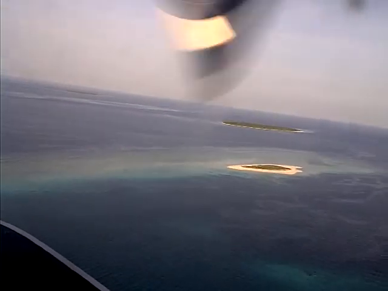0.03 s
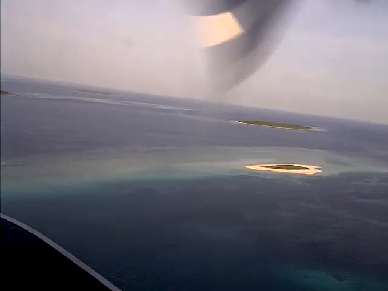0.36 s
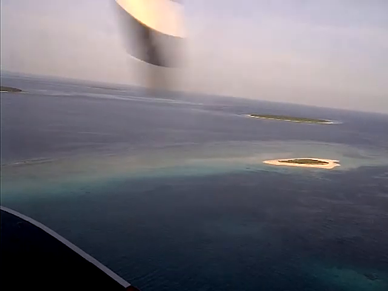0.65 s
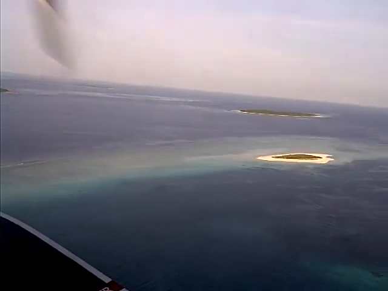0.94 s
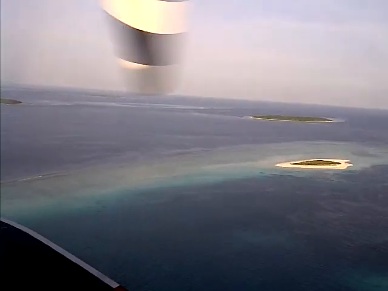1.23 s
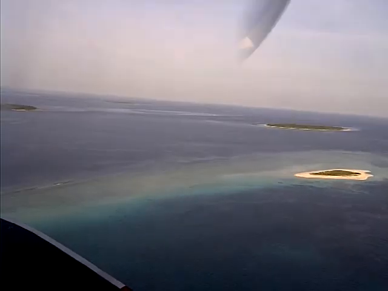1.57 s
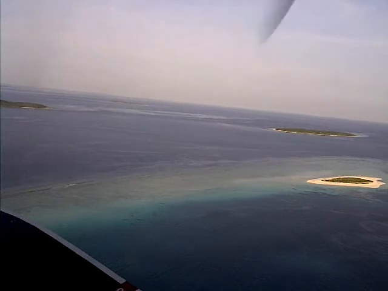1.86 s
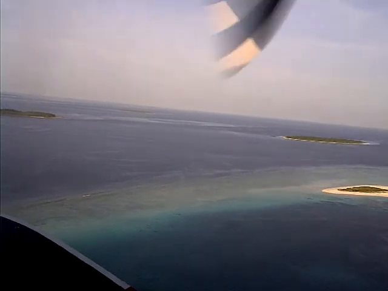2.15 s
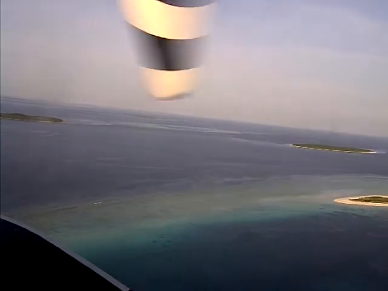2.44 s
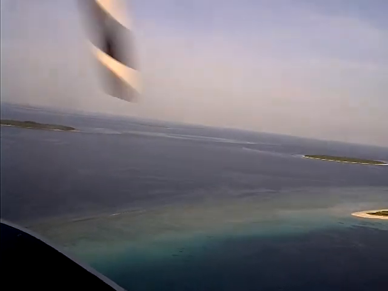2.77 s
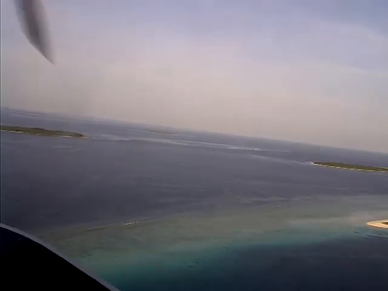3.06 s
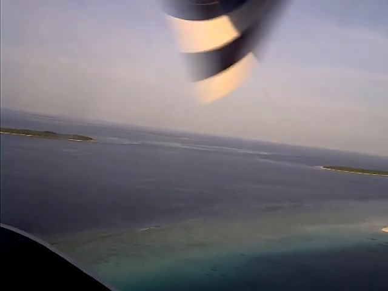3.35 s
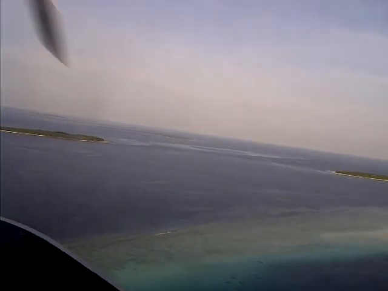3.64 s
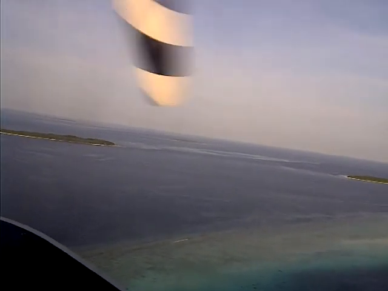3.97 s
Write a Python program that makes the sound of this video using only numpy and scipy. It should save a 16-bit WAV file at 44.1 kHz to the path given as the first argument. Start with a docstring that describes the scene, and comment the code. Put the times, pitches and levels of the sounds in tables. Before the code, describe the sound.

Two propellers drone loudly and throb, heard from the cockpit of a small plane in flight, with air rushing along the hull. A buzz rises, fades and returns while the pitch sinks slightly.

```python
"""Inside a small plane in flight, two three-bladed propellers drone while air roars along the hull.
From the start the engines slowly ease off. The propellers run slightly out of step, so each harmonic
(a multiple of the drone's pitch) throbs at its own pace. After one second a buzz stands out. Just past
two seconds the deepest note partly cancels, and an automatic volume control lifts the rushing air.
Around three seconds the buzz comes back, and the drone ends a little lower than it began."""
import sys
import numpy as np
from scipy import signal
from scipy.fft import rfft, irfft
from scipy.io import wavfile
from scipy.ndimage import uniform_filter1d

SR = 44100
rng = np.random.default_rng(int(sys.argv[2]) if len(sys.argv) > 2 else 0)


def bounce(signal):
    """Save signal as a 16-bit WAV file at the path given by the first command-line argument."""
    frames = np.transpose(np.atleast_2d(signal))
    limited = np.clip(frames, -1, 1)
    pcm = np.round(limited * 32767).astype(np.int16)
    wavfile.write(sys.argv[1], SR, pcm)


N = 176400
TIME = np.arange(N) / SR

# Tone colour of the rushing air, heard through the hull: pitch_hz, level_db (in a band 1 Hz wide)
AIR_COLOUR = [(20, -72.5), (45, -70.5), (65, -63), (100, -53), (150, -58), (230, -54), (340, -56),
              (450, -59.5), (560, -61), (750, -66), (1000, -68), (1200, -69.5), (1400, -66.5),
              (1620, -69.5), (1850, -75.5), (2200, -76), (2500, -75.5), (3200, -80.5), (4000, -88),
              (5400, -91.5), (6500, -99), (7200, -106)]
# How the air's low roar rises and falls: time_s, gain_db
AIR_ROAR = [(0, 1.5), (.7, -1), (1.1, 1.5), (1.4, -0.5), (1.68, 1.5), (1.9, -1), (2.2, -0.5), (2.7, -1),
            (3.2, 0), (3.6, -0.5), (4, -2)]
# How the air's high hiss rises and falls: time_s, gain_db
AIR_HISS = [(0, -1.5), (.5, .3), (.72, -3.5), (.88, -2), (1.2, 3), (1.4, 1.5), (1.6, 1), (1.85, -1),
            (2.1, -1.5), (2.5, -1.5), (2.75, -1), (3.0, -0.5), (3.3, 1), (4, -3)]
# Hull panels that ring in the airflow: pitch_hz, width_hz, level_db
PANELS = [(1379, 96, -45.5), (1630, 71, -50)]
# How the panels' rasp rises and falls: time_s, gain_db
PANEL_RASP = [(0, -1.5), (.7, -2.5), (1.3, -0.5), (1.7, -1), (1.95, -1), (2.4, 1), (2.8, 0.5), (3.1, 0.5),
              (3.6, 1.5), (4, -3.5)]

# How often blades sweep past: time_s, slower_propeller_hz, faster_propeller_lead_hz
BLADE_RATES = [(0, 104.3, -0.091), (.35, 103.3, -.02), (.6, 102.4, 0.425), (.8, 102.3, 0.96),
               (1, 101.6, 1.09), (1.3, 100.9, 0.169), (1.65, 100.1, 0.77), (2, 99.9, 0.623),
               (2.4, 99.67, 0.167), (2.8, 98.9, 0.555), (3.2, 98.87, .24), (3.6, 97.75, 1.05),
               (4, 97.5, .44)]
# Harmonics that throb. The last column is the cabin's response as the blade rate moves off CRUISE_HZ:
# harmonic, slower_propeller_db, faster_propeller_db, cancel_time_s, cabin_db_per_hz
BEATING_HARMONICS = [(1, -23.5, -16, 2.186, 0.05), (2, -21.5, -22.5, 1.725, 1.23),
                     (3, -27, -30.5, 1.34, 0.72), (7, -53, -43.5, 1.377, 0.6), (8, -46.5, -55.5, 2, 1.5),
                     (9, -54, -48.5, 2.17, -0.4), (10, -52.5, -52.5, 1.85, -0.5),
                     (11, -55, -59.5, 2.12, -0.2), (12, -58.5, -57, 1.36, 2)]
# The fourth harmonic swells and fades in the cabin: time_s, level_db
FOURTH_HARMONIC = [(0, -28.5), (.25, -23), (.55, -24.5), (0.679, -43), (0.799, -28), (.97, -36.5),
                   (1.08, -25.5), (1.33, -21), (1.6, -28), (1.92, -36.5), (2.1, -37), (2.399, -40.5),
                   (3.05, -32), (3.48, -22), (3.68, -36.5), (3.8, -28), (4, -36)]
# So does the fifth: time_s, level_db
FIFTH_HARMONIC = [(0, -37), (.1, -41), (.3, -30), (.57, -38), (.73, -25), (.85, -34), (1, -25.5),
                  (1.3, -25), (1.47, -41), (1.68, -29), (2.25, -28.5), (2.75, -29.5), (3.25, -25.5),
                  (3.58, -41), (3.75, -26.5), (4, -37)]
# And the sixth: time_s, level_db
SIXTH_HARMONIC = [(0, -34.5), (0.349, -35.5), (.5, -37.5), (0.651, -34), (.9, -48), (1.05, -39),
                  (1.22, -27), (1.38, -37), (1.56, -28.5), (1.71, -46.5), (1.98, -36.5), (2.25, -43),
                  (2.6, -43.5), (2.85, -50.5), (3.02, -34), (3.25, -37), (3.469, -50.5), (3.66, -35),
                  (4, -47)]
# The buzz, made of the harmonics above the sixth: time_s, gain_db
BUZZ = [(0, 0.5), (.5, 1), (.72, -6.5), (.92, -3.5), (1.05, 6.5), (1.25, 5.5), (1.42, 1.5), (1.64, 6.5),
        (1.73, 3), (1.85, -2.5), (2.5, -8), (3, -1), (3.35, 2.5), (3.65, -1), (4, -3)]
# Weak tones from unequal blades: multiple_of_shaft_rate, level_db
SHAFT_TONES = [(2, -49.5), (4, -40), (7, -43.5), (11, -51), (14, -46.5), (20, -51)]
# Slow swell of the whole sound: time_s, gain_db
SWELL = [(0, 2), (.4, 0.5), (.7, 1.5), (.92, 1), (1.1, -1.9), (1.4, -1), (1.65, 2.66), (1.87, -0.5),
         (2.08, 2.65), (2.5, -0.5), (2.8, 2), (3.25, -1.6), (3.55, 0.6), (3.72, 1.8), (3.85, -0.2),
         (4, 2.5)]

BLADES, CRUISE_HZ = 3, 100


def amp(db):
    """Turn decibels into a number to multiply by."""
    return 10 ** (np.asarray(db) / 20)


def curve(points, at=TIME, column=1):
    """Read one column of a table, joining its points with straight lines."""
    table = np.transpose(points)
    return np.interp(at, table[0], table[column])


def wander(rate_hz):
    """A random wobble with a typical size of 1, moving up to about the given rate."""
    hz = np.fft.rfftfreq(N, 1 / SR)
    wobble = irfft(rfft(rng.standard_normal(N)) / (1 + (hz / rate_hz) ** 2), N)
    return wobble / wobble.std()


def slipstream(hiss_above_hz=1090, patch_db=1.21, gust_db=0.43):
    """Air rushing over the hull: noise with drifting patches and small gusts, coloured by the cabin."""
    frames = dict(nperseg=1024, noverlap=768)
    hz, times, spectrum = signal.stft(rng.standard_normal(N), SR, **frames)
    patches = uniform_filter1d(rng.standard_normal(spectrum.shape), size=9, axis=0)  # blur over pitch
    patches = uniform_filter1d(patches, size=12, axis=1)  # blur over time
    hiss_share = (hz ** 2 / (hz ** 2 + hiss_above_hz ** 2))[:, None]
    gain_db = hiss_share * curve(AIR_HISS, times) + (1 - hiss_share) * curve(AIR_ROAR, times)
    spectrum *= amp(gain_db + patch_db * patches / patches.std())
    noise = signal.istft(spectrum, **frames)[1][:N]
    air_hz, air_db = np.transpose(AIR_COLOUR)
    colour_db = np.interp(np.log(np.fft.rfftfreq(N, 1 / SR) + 1), np.log(air_hz), air_db)
    air = irfft(rfft(noise) * amp(colour_db), N) * np.sqrt(SR / 2)
    return air * amp(gust_db * wander(rate_hz=17))


def panel_rasp():
    """The air shakes the hull panels, and each rings with a narrow band of noise."""
    hz = np.fft.rfftfreq(N, 1 / SR)
    rasp = np.zeros(N)
    for pitch_hz, width_hz, level_db in PANELS:
        ring = irfft(rfft(rng.standard_normal(N)) / (1 + ((hz - pitch_hz) / width_hz) ** 2), N)
        rasp += amp(level_db) * ring / ring.std()
    return rasp * amp(curve(PANEL_RASP))


def blade_tone(passes, multiple, waver_db=0.2353, waver_rad=0.011, waver_hz=14):
    """A tone at a multiple of the blade rate. Rough air shakes it, and shakes higher tones more."""
    strength = np.sqrt(2) * amp(waver_db * np.sqrt(multiple) * wander(waver_hz))
    phase = 2 * np.pi * (multiple * passes + rng.random())
    phase += multiple * waver_rad * wander(waver_hz)
    return strength * np.exp(1j * phase)  # a complex number holds both strength and phase


def propellers():
    """One propeller slips ahead of the other, so their tones take turns adding up and cancelling."""
    rate_hz = curve(BLADE_RATES)
    passes = np.cumsum(rate_hz) / SR  # blade passes of the slower propeller so far
    lead = np.cumsum(curve(BLADE_RATES, column=2)) / SR  # extra passes of the faster one
    swelling = [(4, FOURTH_HARMONIC), (5, FIFTH_HARMONIC), (6, SIXTH_HARMONIC)]
    drone = sum(amp(curve(levels)) * blade_tone(passes, harmonic) for harmonic, levels in swelling)
    for harmonic, slower_db, faster_db, cancel_s, cabin_db_per_hz in BEATING_HARMONICS:
        slip = lead - np.interp(cancel_s, TIME, lead)
        beat = amp(slower_db) - amp(faster_db) * np.exp(2j * np.pi * harmonic * slip)
        cabin_db = cabin_db_per_hz * (rate_hz - CRUISE_HZ)
        buzz_db = curve(BUZZ) if harmonic > 6 else 0
        drone += blade_tone(passes, harmonic) * beat * amp(cabin_db + buzz_db)
    for multiple, level_db in SHAFT_TONES:
        drone += amp(level_db) * blade_tone(passes + lead / 2, multiple / BLADES)
    return drone.real


def scene(halving_pressure=0.37, crest_bias=0.019):
    """Drone and air at one cockpit microphone. The drone's pressure crests and troughs choke the noise."""
    drone = propellers()
    flutter = 1 / (1 + ((drone + crest_bias) / halving_pressure) ** 4)
    noise = slipstream() + panel_rasp()
    return (drone + flutter * noise)[None]


def record(dry, resting_db=-15, react_s=0.051, ceiling=0.52, knee=5.1):
    """A volume control evens the level, a swell rides on it, and peaks, rumble and top are trimmed."""
    window = round(react_s * SR)
    power = uniform_filter1d(uniform_filter1d(dry[0] ** 2, window), window)
    control_db = 0.85 * (resting_db - 10 * np.log10(power))  # removes 85% of any level change
    sound = dry * amp(control_db + curve(SWELL))
    sound = sound / (1 + abs(sound / ceiling) ** knee) ** (1 / knee)  # round off the peaks
    rumble_cut = signal.butter(1, 24, "highpass", fs=SR, output="sos")  # below 24 Hz
    treble_cut = signal.firwin(511, 7300, window=("kaiser", 9), fs=SR)  # above 7300 Hz
    sound = signal.sosfilt(rumble_cut, sound)
    return signal.oaconvolve(sound, treble_cut[None], "same")


dry = scene()
out = record(dry)
bounce(out)
```